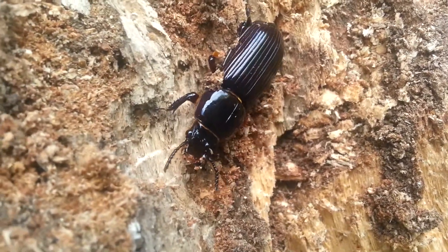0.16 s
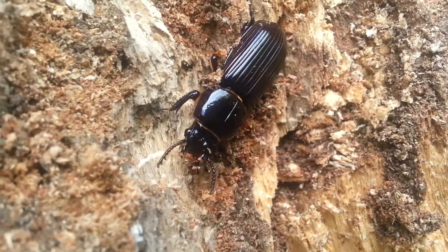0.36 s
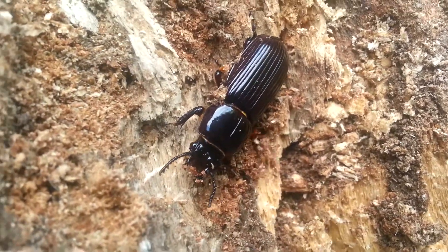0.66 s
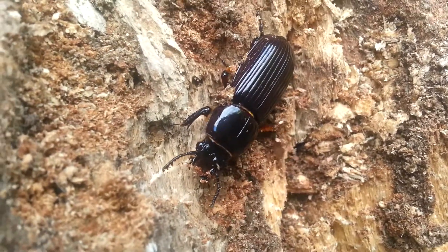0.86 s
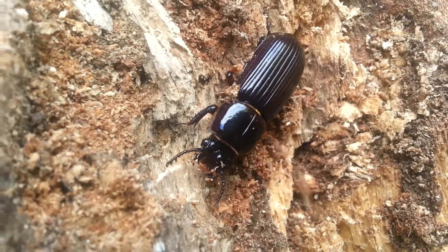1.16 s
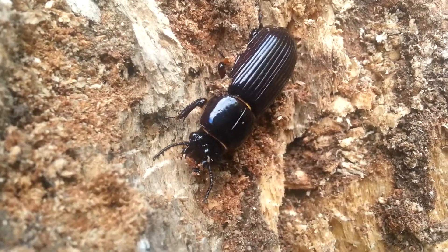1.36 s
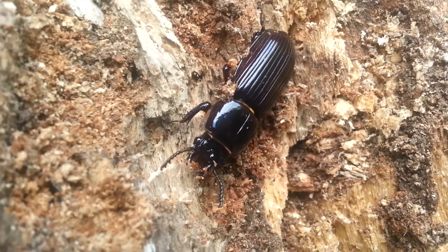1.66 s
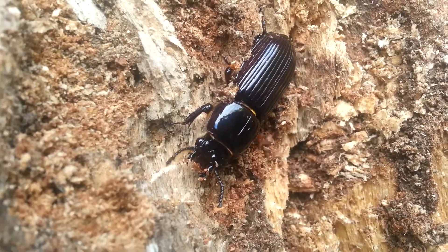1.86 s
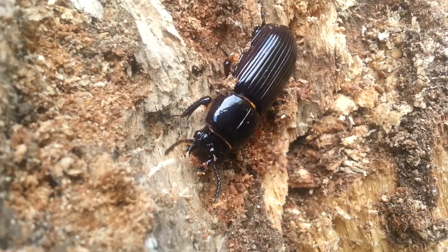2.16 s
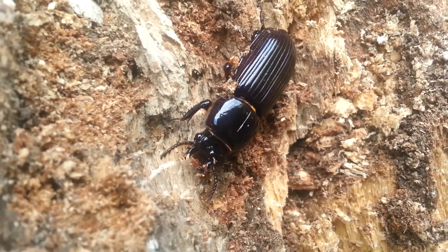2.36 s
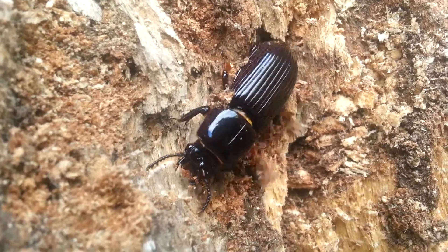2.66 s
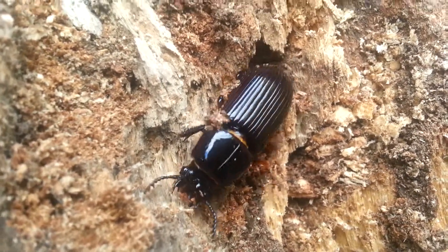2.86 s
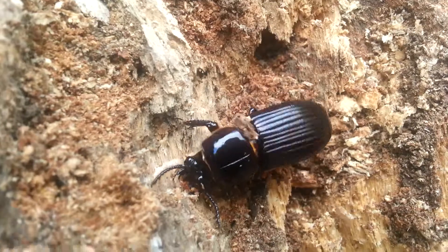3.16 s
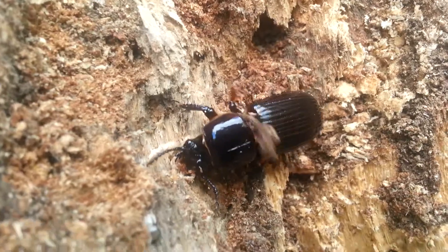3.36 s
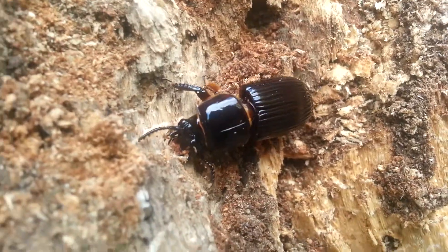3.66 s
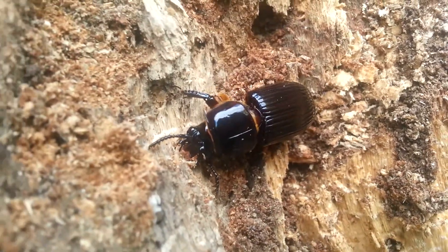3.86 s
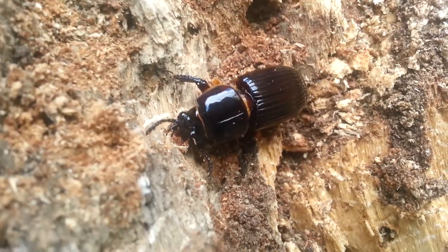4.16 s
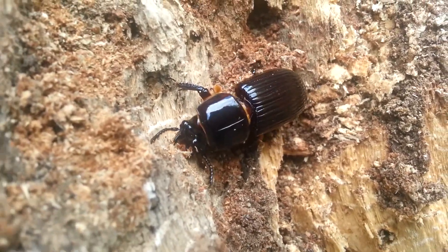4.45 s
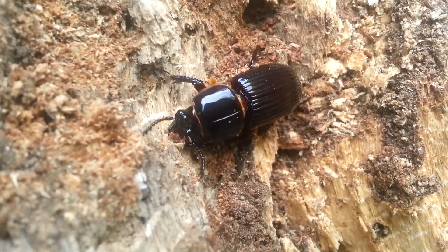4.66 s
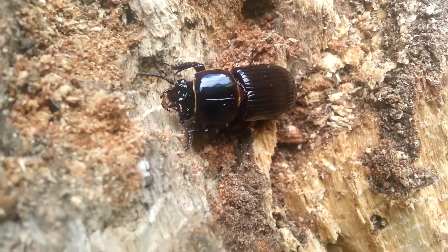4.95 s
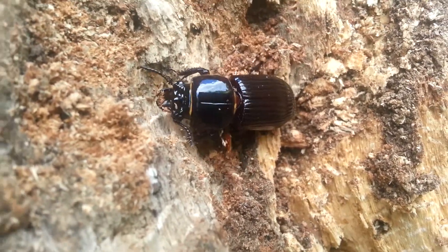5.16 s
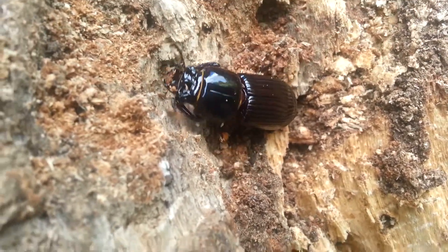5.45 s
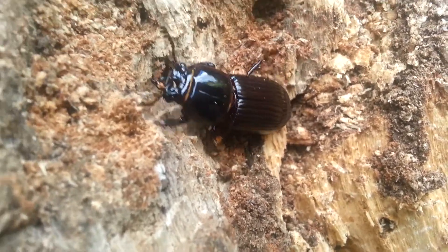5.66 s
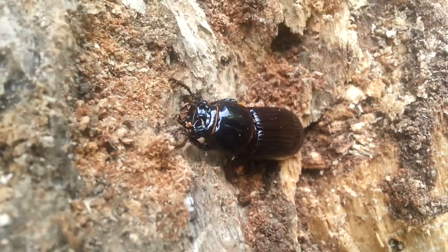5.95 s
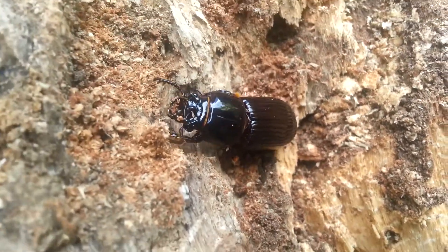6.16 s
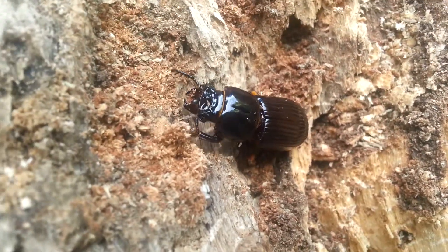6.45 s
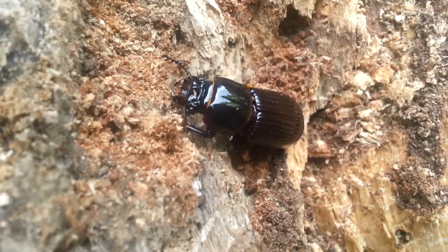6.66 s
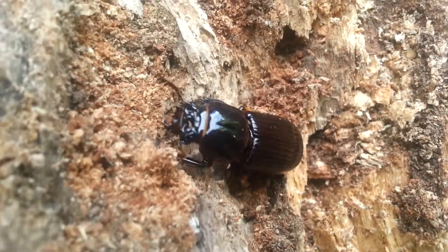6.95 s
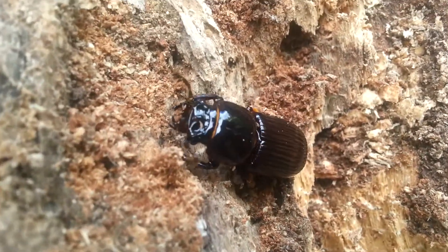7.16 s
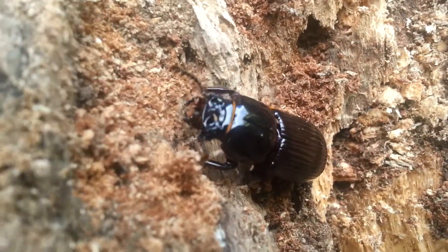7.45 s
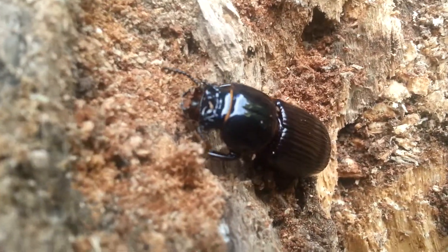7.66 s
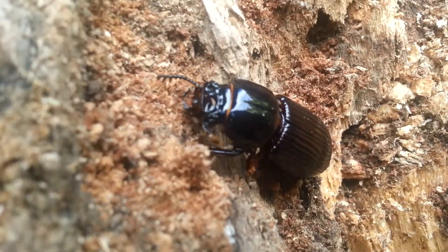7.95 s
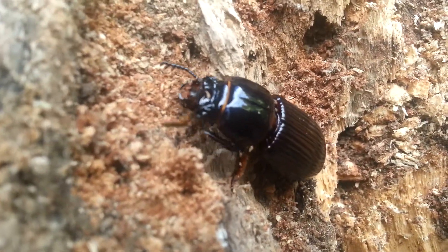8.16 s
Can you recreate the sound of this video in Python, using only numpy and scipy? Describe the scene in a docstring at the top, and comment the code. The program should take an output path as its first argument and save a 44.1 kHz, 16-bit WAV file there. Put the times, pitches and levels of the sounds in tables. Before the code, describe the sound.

A buzzing low motor drone opens the scene, slows and dies away, leaving faint far motors swelling and sinking. High, dry little bursts of downward chips sound at the very start and return regularly through the second half, mostly from the left. Short cricket trills ring in between. The place is open, with muted traffic, distant insects and fine microphone hiss; the beetle itself makes no distinct sound.

```python
"""A summer yard at two microphone ports, 8.3 s, over street rumble, traffic wash and a cricket chorus.
From the start a slow engine hums as multiples of its cycle; it winds down and stops at 3.9 s, its air noise fading.
A left-hand cricket trills every 2.2-2.3 s, others answer: wing strokes ring as short arched tones.
A small caller gives two groups of falling whistles at first and more from 4.2 s; calls leave a blurred echo.
From 3.7 s far motors drone as single swelling tones."""
import sys
import numpy as np
from scipy import signal
from scipy.fft import rfft, irfft, next_fast_len
from scipy.io import wavfile
from scipy.ndimage import uniform_filter1d, map_coordinates

SR = 44100
rng = np.random.default_rng(int(sys.argv[2]) if len(sys.argv) > 2 else 0)


def inscribe(sig):
    """Save sig as 16-bit PCM at rate SR to the path in sys.argv[1].

    A 1-D sig is mono; a 2-D sig holds one channel per row.
    Samples are clipped to [-1, 1] before scaling.
    """
    pcm = np.round(np.clip(np.atleast_2d(sig).T, -1, 1) * 32767)
    wavfile.write(sys.argv[1], SR, pcm.astype(np.int16))


N = 365588


def amp(db):
    """Gain of a level in dB."""
    return 10 ** (np.asarray(db) / 20)


def unit(x):
    """x at rms 1."""
    return x / np.sqrt(np.mean(x ** 2) + 1e-20)


def along(points, hz):
    """Columns of (frequency [Hz], value, ..) rows, interpolated on a log axis."""
    knot_hz, *columns = np.transpose(points)
    return [np.interp(np.log(hz + 1), np.log(knot_hz + 1), column) for column in columns]


def curves(rows):
    """One value per sample for each column after the time [s]."""
    knot_s, *columns = np.transpose(rows)
    return [np.interp(np.arange(N) / SR, knot_s, column) for column in columns]


def wobble(knots_per_s):
    """Smooth random curve through normal knots."""
    knots = rng.standard_normal(int(N * knots_per_s / SR) + 4)
    return map_coordinates(knots, [np.arange(N) * knots_per_s / SR])


def filtered(x, response):
    """x times a complex response of frequency."""
    m = next_fast_len(N + 8192)
    return irfft(rfft(x, m) * response(np.fft.rfftfreq(m, 1 / SR)), m)[..., :N]


def rush(spectrum, patchy_db):
    """Two unrelated noises of rms 1 that share time-frequency patches of random gain."""
    z = signal.stft(rng.standard_normal((2, N)), nperseg=512)[2]
    patches = uniform_filter1d(rng.standard_normal(z.shape[1:]), 6, 0)
    patches = uniform_filter1d(patches, 20, 1)
    pair = signal.istft(z * amp(patchy_db * unit(patches)), nperseg=512)[1][:, :N]
    return unit(filtered(pair, lambda hz: amp(along(spectrum, hz)[0])))


def add(out, start_s, turns, shape, pan_db, lead_rad):
    """Lay a short tone on both ports; turns = cycles so far, lead_rad = how far left leads."""
    at = max(round(start_s * SR), 0)
    phase = 2 * np.pi * (turns + rng.random()) + np.array([[lead_rad / 2], [-lead_rad / 2]])
    out[:, at:at + len(shape)] += amp([[pan_db / 2], [-pan_db / 2]]) * shape * np.sin(phase)


# background levels: (time [s], street rumble [dB], traffic wash [dB], chorus [dB])
YARD_LEVELS = [(0, -45.5, -49.5, -62.5), (.85, -48.5, -49, -64), (1.6, -49, -50.5, -63.5),
               (2.3, -51.5, -51.5, -63.5), (3.2, -49, -51, -62.5), (4, -51, -52, -66),
               (4.5, -50.5, -51.5, -63), (5.2, -50, -52.5, -66), (6.8, -52, -52.5, -65),
               (8.29, -48.5, -51.5, -66)]
# noise colours, relative: (frequency [Hz], density [dB per Hz])
RUMBLE_SPECTRUM = [(15, -75), (25, -43), (54, -13.5), (103, 0.5), (144, 0.5), (184, 1), (204, -5),
                   (246, -5.5), (400, -11), (520, -15), (880, -120)]
WASH_SPECTRUM = [(150, -45.5), (250, -14), (307, -5.5), (366, -9.5), (522, -3.5), (582, -7.5), (705, -7.5),
                 (913, -10), (1030, -10.5), (1760, -19.5), (3980, -22), (5370, -20.5), (6500, -34),
                 (8450, -51), (14300, -120)]


def streets():
    """Low rumble and tyre wash of the streets around, as patchy coloured noise."""
    rumble_db, wash_db, _ = curves(YARD_LEVELS)
    rumble = amp(rumble_db) * rush(RUMBLE_SPECTRUM, patchy_db=1.37)
    wash = amp(wash_db + 0.72 * wobble(3.245)) * rush(WASH_SPECTRUM, patchy_db=0.54)
    return rumble + wash


# far singers: (pitch [Hz], chirps [per s], share of time singing [0-1], strokes [per s], relative level [dB])
CHORUS = [(4860, 1.9, .4, 42, -1.5), (4980, 2.4, .5, 45, -.5), (5090, 1.6, .6, 40, 0),
          (5200, 2.8, .6, 47, -1), (5310, 2.1, .5, 43, -1), (5410, 1.8, .5, 44, -3),
          (5500, 1.45, .3, 50, 0), (5600, 2.6, .5, 46, -4), (5720, 2.4, .3, 52, -3.5),
          (7135, .4, .9, 61, -12.5)]


def chorus():
    """Far crickets: steady tones pulsed by wing strokes within chirps, over a constant floor."""
    t = np.arange(N) / SR
    choir = np.zeros((2, N))
    for hz, chirps_per_s, share, strokes_per_s, db in CHORUS:
        singing = (chirps_per_s * t + rng.random() + .15 * wobble(1.2)) % 1 < share
        strokes = np.sin(np.pi * strokes_per_s * t) ** 2
        gate = uniform_filter1d(singing * strokes, 200) + 0.66
        # leaves scatter each song: phase wanders differently in each row
        drift_rad = 2.4 * np.array([wobble(90), wobble(90)])
        choir += amp(db + 2.6 * wobble(2.56)) * gate * np.sin(2 * np.pi * hz * t + drift_rad)
    return amp(curves(YARD_LEVELS)[2]) * unit(choir)


FAN_DB, FAN_FADE_DB_PER_S = -47.5, 8.5  # level at the engine's loudest; fade once it stops
FAN_FOLLOWS = 0.58  # share of the engine's dB swings
# air noise colour, relative: (frequency [Hz], density [dB per Hz])
FAN_SPECTRUM = [(50, -29), (85, -9), (140, 0), (210, -5), (300, -14.5), (600, -22), (1300, -33),
                (2500, -29.5), (4000, -38), (8000, -39.5), (15000, -39)]


def fan():
    """Engine air noise: coloured noise that follows part of the engine level, then dies away."""
    engine_db = curves(ENGINE)[1]
    stopped_s = np.clip(np.arange(N) / SR - ENGINE[-1][0], 0, None)
    fan_db = FAN_DB + FAN_FOLLOWS * (engine_db - engine_db.max()) - FAN_FADE_DB_PER_S * stopped_s
    return amp(fan_db) * rush(FAN_SPECTRUM, patchy_db=1.5)


# port pair: (frequency [Hz], left minus right before side scaling [dB], likeness [0-1], left leads by [rad])
PORTS = [(60, 3, 0.99, 0.1), (171, 0.5, 0.98, 0.11), (344, 0, .8, 0.11), (520, -2.2, 0.77, 0.56),
         (684, -2, 0.48, 0.64), (836, -6, 0.6, 1.88), (868, -4, 0.76, 2.24), (983, 1, 0.69, 3.13),
         (1195, 3, 0.69, 3.44), (1375, 6, 0.37, 2.9), (1570, 4.5, 0.2, 6.2), (2020, 2, 0.17, 3),
         (2630, 3.5, 0.1, 7.5), (3170, -0.5, 0.21, 3.5), (4420, 2, 0.07, 5.55), (5130, -6, 0.18, 4.54),
         (6200, -0.5, 0, 13.5)]


def at_ports(a, b):
    """Left hears a; right hears a turned in phase, mixed with the unrelated sound b."""
    def side(hz, half_pan):
        pan_db, alike, lead_rad = along(PORTS, hz)
        alike = np.clip(alike, 0, 1)
        return amp(half_pan * pan_db / 2), alike * np.exp(-1j * lead_rad), np.sqrt(1 - alike ** 2)

    def right_response(hz):
        gain = side(hz, -0.85)[0]
        return gain * np.array(side(hz, -1)[1:])

    left = filtered(a, lambda hz: side(hz, 0.94)[0])
    right = filtered(np.array([a, b]), right_response).sum(axis=0)
    return np.array([left, right])


def yard():
    """Streets, chorus and engine air noise, spread over the ports by frequency."""
    return at_ports(*(streets() + chorus() + fan()))


MOTOR_GAIN = np.sqrt(2) * amp([[.5], [-.5]])  # sine of rms 1, left 1 dB over right
# far motors: (start [s], loudest [s], end [s], first pitch [Hz], last pitch [Hz],
#              rms level at loudest before tremble [dB], swell [dB])
DRONES = [(3.9, 4.4, 4.9, 149, 148.2, -53, 4.5), (4.1, 4.55, 4.83, 141, 140.5, -52.5, 7.5),
          (3.7, 4.1, 5.9, 198, 197.4, -59, 4.5), (4.095, 4.4, 5.4, 100, 91.9, -60, 11),
          (5.6, 5.848, 6.5, 139, 136.2, -56.5, 6), (5.901, 7.8, 8.29, 177, 176.9, -58.5, 6.5),
          (6.603, 6.851, 8.2, 148, 149.5, -55.5, 12)]


def drones():
    """Far motors: gliding sines, each swelling and sinking, with trembling level and phase."""
    t = np.arange(N) / SR
    hum = np.zeros(N)
    for start_s, loudest_s, end_s, first_hz, last_hz, db, swell_db in DRONES:
        hz = np.interp(t, [start_s, end_s], [first_hz, last_hz])
        level_db = db - swell_db * np.interp(t, [start_s, loudest_s, end_s], [1, 0, 1])
        fade = np.clip(np.minimum(t - start_s, end_s + 0.12 - t) / 0.14, 0, 1)
        phase = 2 * np.pi * np.cumsum(hz) / SR + .7 * wobble(8)
        hum += fade * amp(level_db + 3 * wobble(7)) * np.sin(phase)
    return MOTOR_GAIN * hum


# trills: (singer, start [s], length [s], stroke level before swell and jitter [dB], swell over the trill [dB]);
# the "high" row at 6.823 s is no other singer: it blurs the near cricket's last trill
TRILLS = [("near", .065, .3, -47, 3), ("middle", .375, .2, -64, -4), ("middle", .64, .4, -64, 0),
          ("lowest", 1, 2.2, -68.5, 3), ("low", 1.441, .295, -58, 1), ("middle", 2.3, .3, -64, 0),
          ("near", 2.363, .3, -48, 2), ("low", 3.841, .32, -62, 0), ("middle", 4.17, .25, -66, -2),
          ("near", 4.638, .3, -51, 0), ("middle", 6.6, .2, -65, 0), ("low", 6.72, .3, -65, 0),
          ("near", 6.81, .325, -54.5, -4), ("high", 6.823, .12, -58, -3), ("high", 7.46, .28, -65, 1)]
# singer: (wing strokes [per s], settled pitch before arch [Hz], climb at the start [0-1],
#          left minus right [dB], left leads by [rad])
SINGERS = dict(near=(39.6, 4325, .025, 8, .8), low=(37.4, 3900, .004, 2, 3.15),
           middle=(38, 4100, .004, 2.5, .1), high=(39, 4250, .004, 2, 2.6),
           lowest=(39.7, 2850, .004, -2, 2.9))


def crickets():
    """Each wing stroke rings one tone arched in pitch; the trill climbs in pitch as it settles."""
    out = np.zeros((2, N + SR))
    u = np.linspace(0, 1, round(0.018 * SR))
    stroke = np.sin(np.pi * u ** 1.25) ** .75
    # the wing slows at both ends of the file
    arch = 1 - 0.015 * ((u - .5) / .5) ** 2 - 0.035 * u ** 5
    for singer, start_s, length_s, db, swell_db in TRILLS:
        rate, hz, climb, pan_db, lead_rad = SINGERS[singer]
        strokes = round(length_s * rate)
        for k, (size, late, flat) in enumerate(rng.standard_normal((strokes, 3))):
            pitch_hz = hz * (1 - climb * np.exp(-k / 2.1) + .0015 * flat)
            level_db = db + swell_db * (k / strokes - .5) - 3 * (k == 0) + .6 * size
            turns = np.cumsum(pitch_hz * arch) / SR
            add(out, start_s + k / rate + 0.00052 * late, turns, amp(level_db) * stroke, pan_db, lead_rad)
    return out[:, :N]


CHIP_GAP_S, SHY_DB = .0284, 9  # spacing; how much weaker a group begins
LAST_HZ = 3000  # foot of the slide, before jitter
# groups: (first chip [s], chips [count], full level before accent and jitter [dB],
#          chips to reach full voice [count], top pitch before phrase factor [Hz])
CHIPS = [(.005, 4, -55, 3, 3700), (.385, 6, -57, 2, 3700), (4.213, 2, -60, 3, 3500),
         (4.691, 2, -56, 1, 3950), (4.99, 6, -54, 4, 3950), (5.416, 5, -54, 2, 4000),
         (5.814, 5, -55, 1, 3900), (6.234, 5, -53.5, 1, 3750), (6.632, 5, -54.5, 1, 3800),
         (7.057, 5, -54, 1, 3800)]
# chips of a group, last row = last chip: (pitch over the group's [ratio], accent [dB], break in the middle [0-1])
PHRASE = [(.94, 0, .2), (.94, 0, .2), (.95, 0, .1), (1.04, -1, .8), (1.01, 0, .25), (1.01, 0, .5)]


def chips():
    """Short whistles sliding down in pitch, in near-even groups that start shyly."""
    out = np.zeros((2, N + SR))
    u = np.linspace(0, 1, round(0.0179 * SR))
    for start_s, number, db, warm, first_hz in CHIPS:
        for k, (late, size, high, low) in enumerate(rng.standard_normal((number, 4))):
            pitch, accent_db, broken = PHRASE[k - number]
            top_hz = first_hz * (pitch + .015 * high)
            foot_hz = LAST_HZ * (1 + .02 * low)
            turns = np.cumsum(top_hz + (foot_hz - top_hz) * u ** 1.05) / SR
            breaks = 1 - broken * np.exp(-((u - rng.uniform(.4, .6)) / .16) ** 2)
            level_db = db + accent_db - SHY_DB * max(1 - k / warm, 0) + 1.2 * size
            shape = amp(level_db) * breaks * np.sin(np.pi * u) ** 0.63
            add(out, start_s + k * CHIP_GAP_S + 0.000977 * late, turns, shape, pan_db=9.0, lead_rad=.01)
    return out[:, :N]


def echoes(x):
    """Trees and walls return a decaying noise tail, redrawn 8 times a second as the leaves move."""
    t = np.arange(SR // 3) / SR
    out = np.zeros((2, N + SR))
    for at in range(0, N, SR // 8):
        # 60 dB down in 150 ms, silent for the first 6 ms
        tail = rng.standard_normal((2, len(t))) * amp(-60 * t / .15) * (t > .006)
        wet = signal.fftconvolve(x[:, at:at + SR // 8], tail / np.linalg.norm(tail[0]), axes=1)
        out[:, at:at + wet.shape[1]] += wet
    return out[:, :N]


# engine run: (time [s], cycle rate [per s], level before orders and pipe [dB])
ENGINE = [(0, 15.04, -50), (.35, 15.25, -49.5), (.75, 15.22, -50.5), (1.15, 15.07, -51), (1.3, 14.6, -55),
          (1.45, 14.3, -53.5), (1.8, 14.14, -58), (2, 13.46, -62), (2.2, 13.36, -64), (2.4, 13.68, -58),
          (2.55, 13.6, -58.5), (2.85, 12.72, -60), (3.15, 12.25, -57), (3.25, 11.71, -57.5),
          (3.35, 10.69, -62), (3.45, 9.95, -66), (3.6, 9.19, -67), (3.9, 8.6, -71)]
SLOWING_MOST = 3  # cycles per s
# orders: (multiple of the cycle, level [dB], gain per cycle per s of slowing, up to SLOWING_MOST [dB])
ORDERS = [(6, 4.5, -.7), (7, -14, 0), (8, -11, 0), (9, 4.5, 0), (10, -8, -2), (11, 3, -1.5), (12, 6, 1),
          (13, 4, -3), (14, .5, -1), (15, 1.5, -1), (16, -7, 1), (17, -7, 0), (18, -6, 0), (21, -12, 0)]
# what pipe and yard pass: (frequency [Hz], gain [dB])
PIPE = [(50, -9.6), (75, -0.7), (85, -5.8), (93, 2.4), (110, 3.6), (125, 6.1), (138, 4.2), (150, 4.2),
        (160, 3.0), (170, 5.1), (180, -6.0), (190, 3.4), (200, 5.8), (215, -1.7), (240, -5.0), (280, -9.3)]
# brief surge of multiples 17 and 18: (centre [s], Gaussian width [s], level of each before MOTOR_GAIN [dB])
SURGE = (0.85, 0.061, -48)


def engine():
    """Trembling multiples of the engine cycle, coloured by the pipe as the rate falls."""
    t = np.arange(N) / SR
    rate, level_db = curves(ENGINE)
    cycles = np.cumsum(rate) / SR
    slowing = np.minimum(rate.max() - rate, SLOWING_MOST)
    hum = np.zeros(N)
    for k, db, gain_db in ORDERS:
        order_db = level_db + db + gain_db * slowing + along(PIPE, k * rate)[0] + 1.2 * wobble(5)
        phase = 2 * np.pi * (k * cycles + rng.random()) + .25 * wobble(7)
        hum += amp(order_db) * np.sin(phase)
    hum *= np.clip((ENGINE[-1][0] - t) / 0.24, 0, 1)
    surge_s, width_s, surge_db = SURGE
    swell = amp(surge_db) * np.exp(-((t - surge_s) / width_s) ** 2 / 2)
    hum += swell * (np.sin(2 * np.pi * 17 * cycles) + np.sin(2 * np.pi * 18 * cycles))
    return MOTOR_GAIN * hum


def scene():
    """All sources at the two ports, the calls with echoes 9 dB down."""
    background = yard() + drones()
    calls = crickets() + chips()
    return background + calls + amp(-9) * echoes(calls) + engine()


HISS_DB, TOP_HZ = -61, 14530  # level before wobble; band limit
# microphone noise colour, relative: (frequency [Hz], density [dB per Hz])
HISS_SPECTRUM = [(1500, -44), (4000, -4.5), (7000, 0), (10000, -1.5), (15000, -1)]


def record(dry):
    """Microphones add their own hiss; nothing is kept above the band limit."""
    hiss = amp(HISS_DB + 0.23 * wobble(5)) * rush(HISS_SPECTRUM, patchy_db=1.2)
    return filtered(dry + hiss, lambda hz: hz < TOP_HZ)


dry = scene()
out = record(dry)
inscribe(out)
```